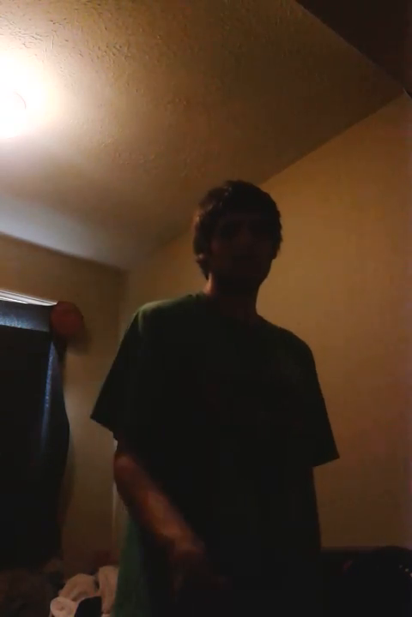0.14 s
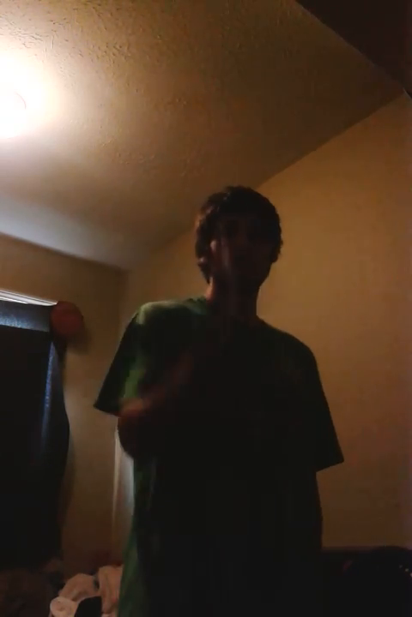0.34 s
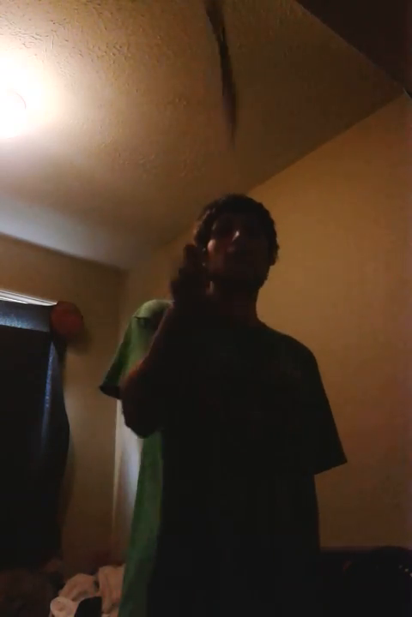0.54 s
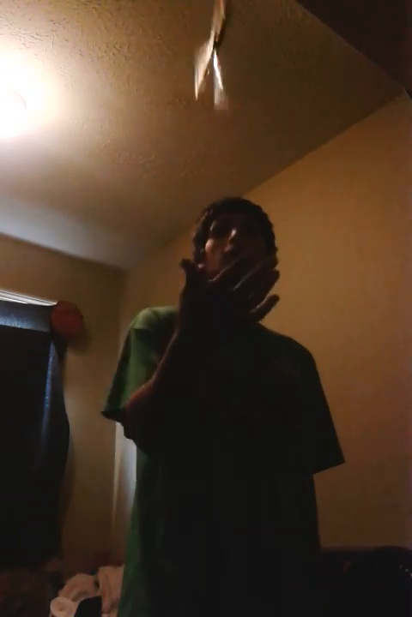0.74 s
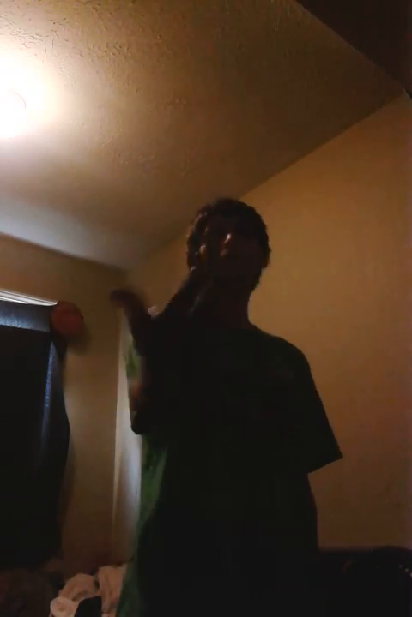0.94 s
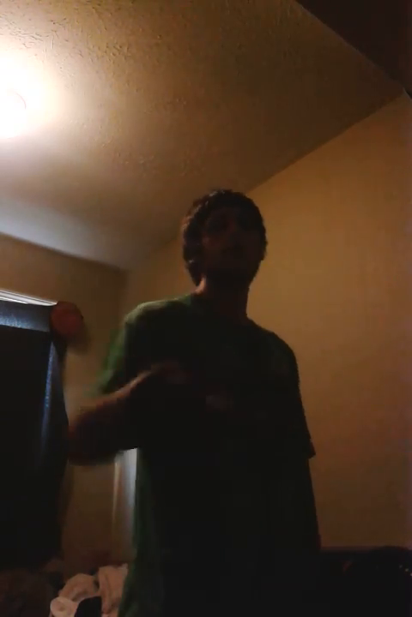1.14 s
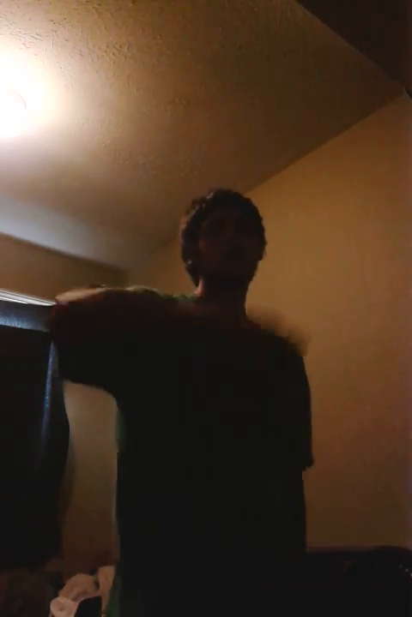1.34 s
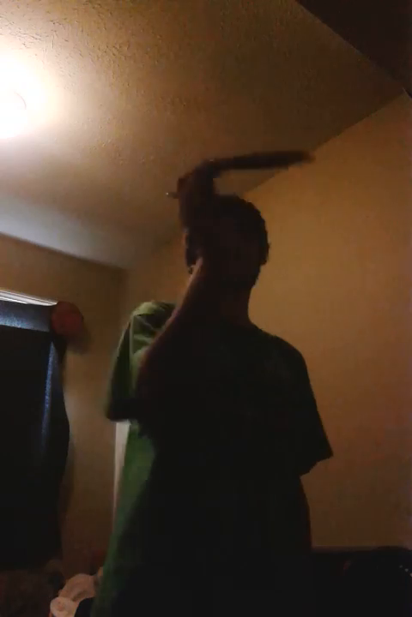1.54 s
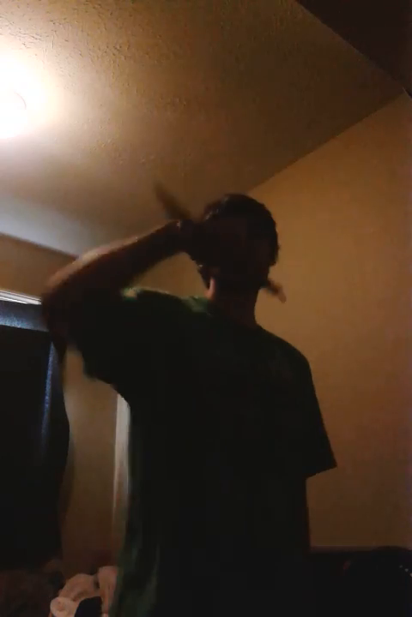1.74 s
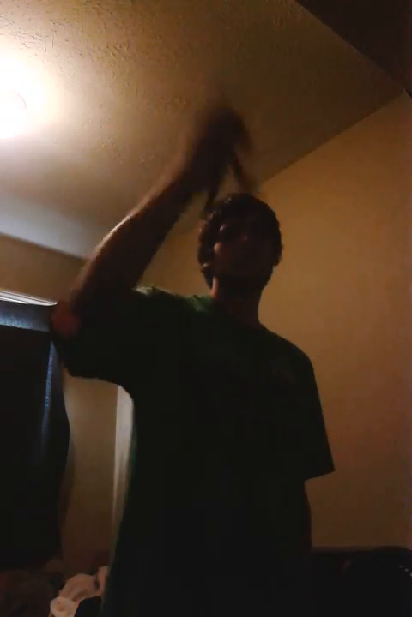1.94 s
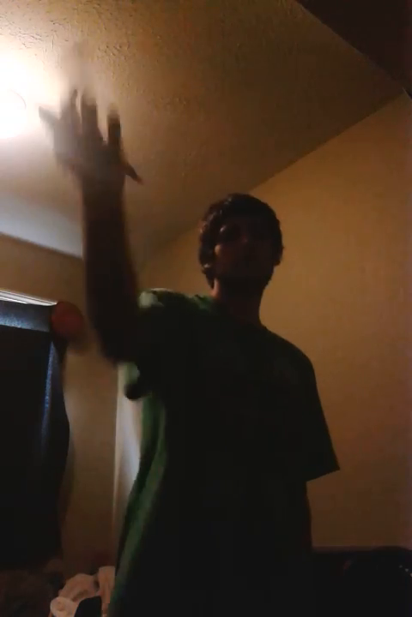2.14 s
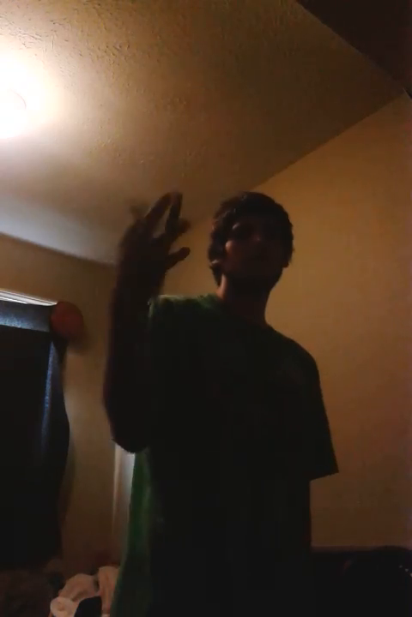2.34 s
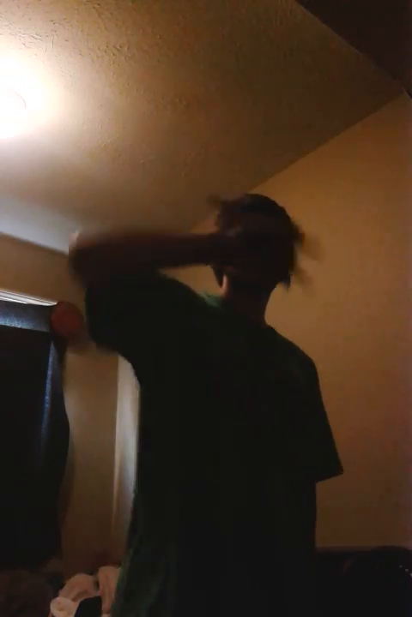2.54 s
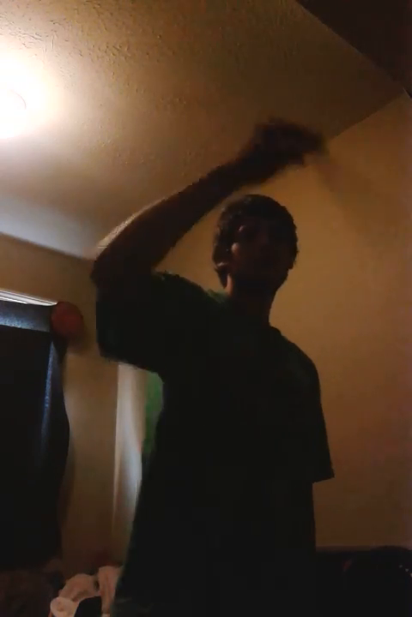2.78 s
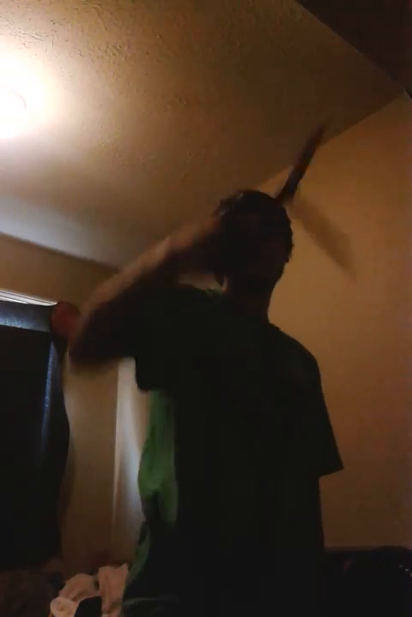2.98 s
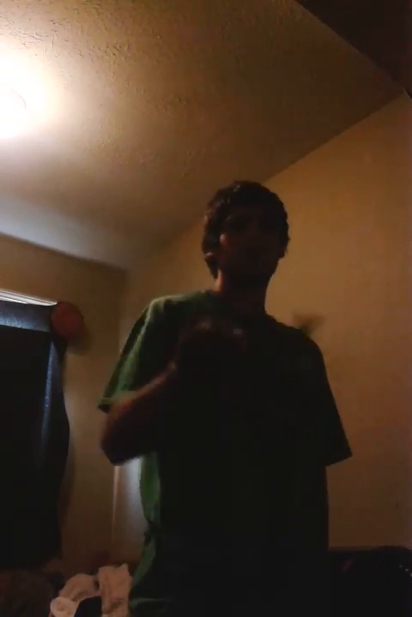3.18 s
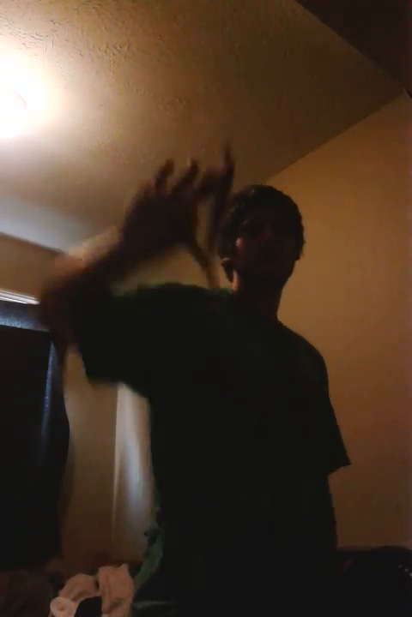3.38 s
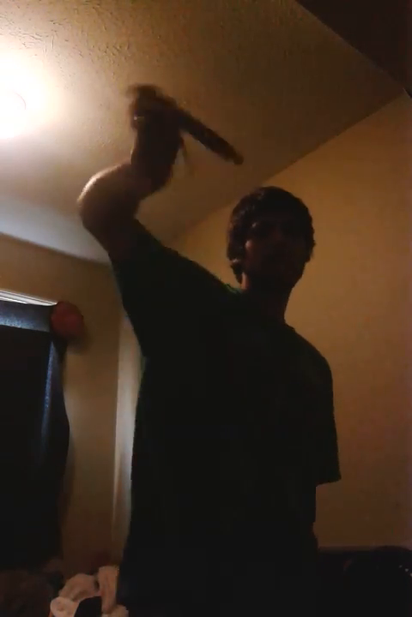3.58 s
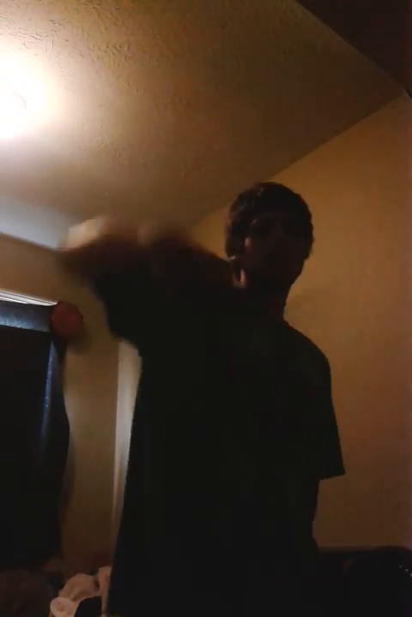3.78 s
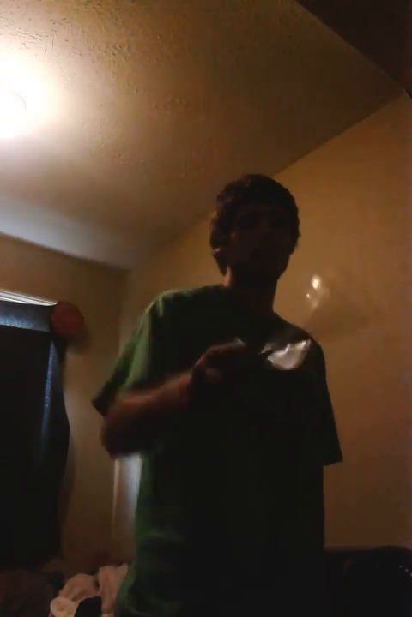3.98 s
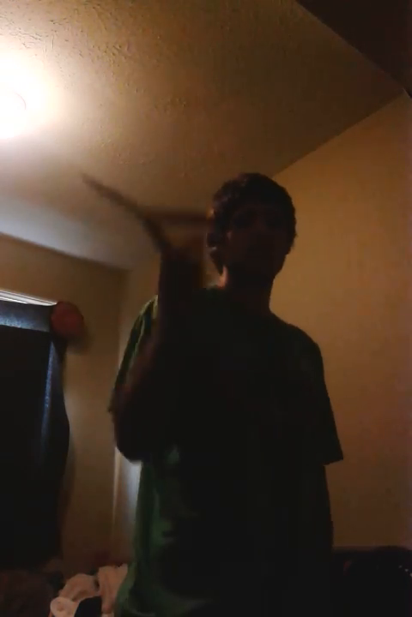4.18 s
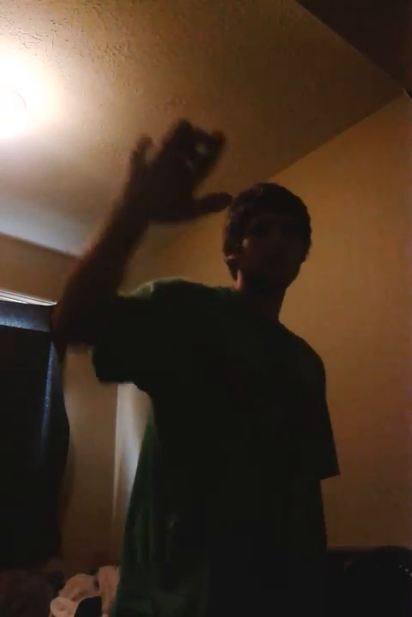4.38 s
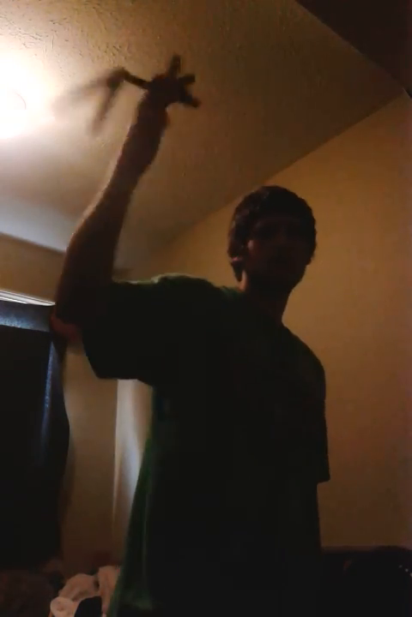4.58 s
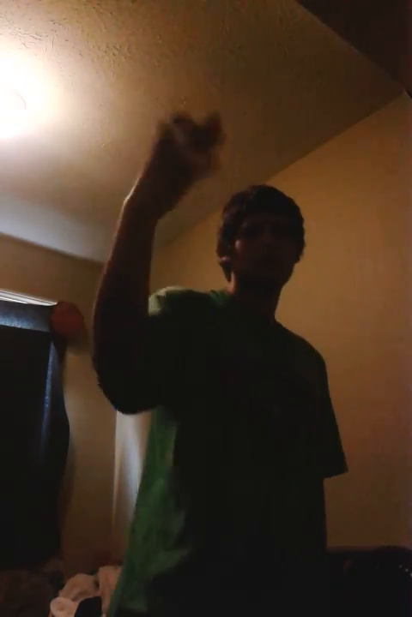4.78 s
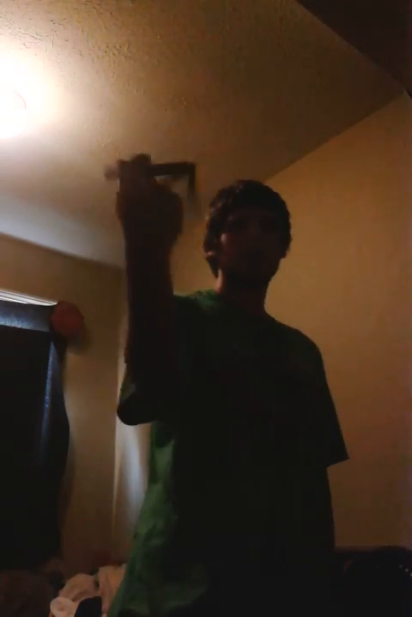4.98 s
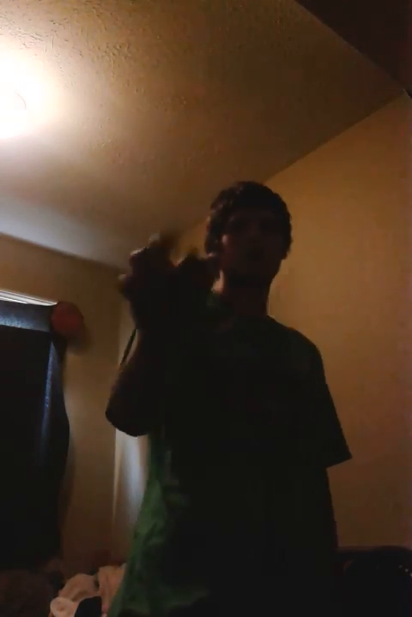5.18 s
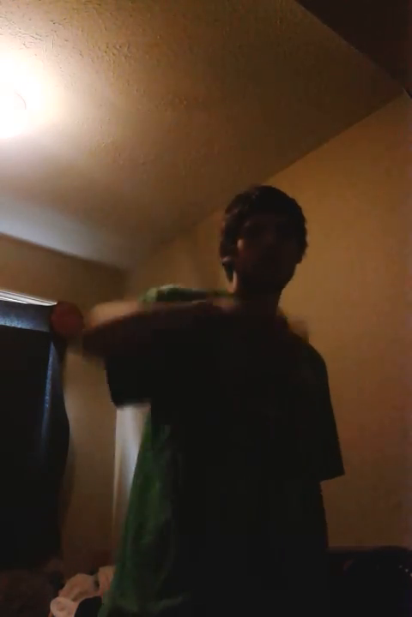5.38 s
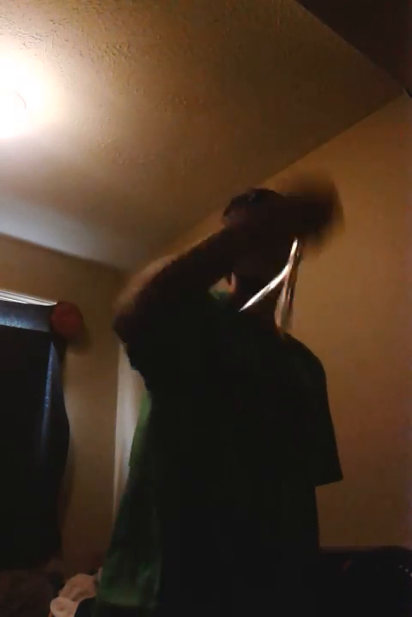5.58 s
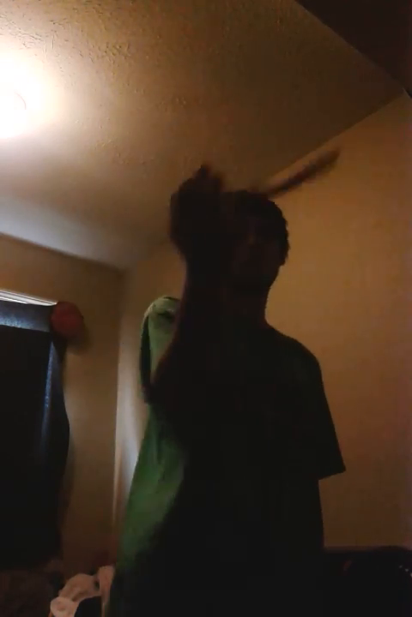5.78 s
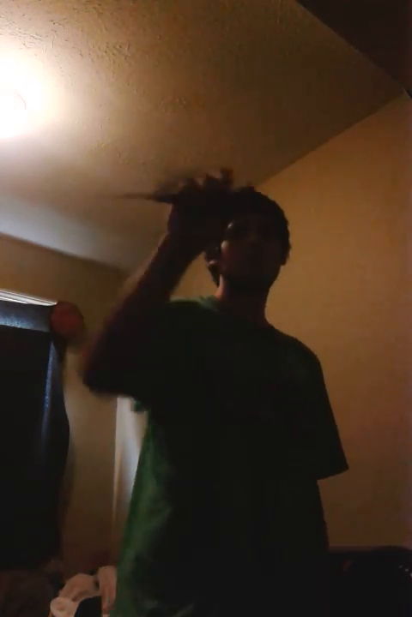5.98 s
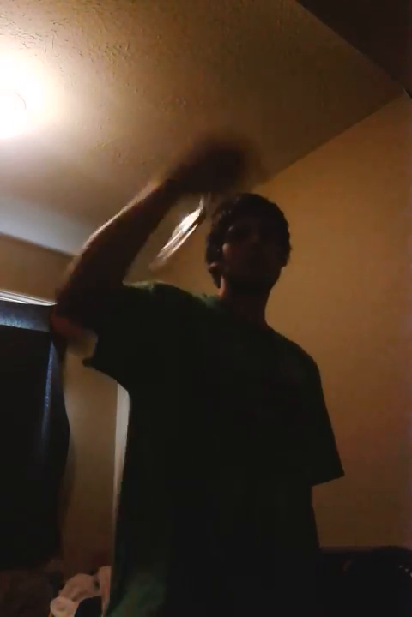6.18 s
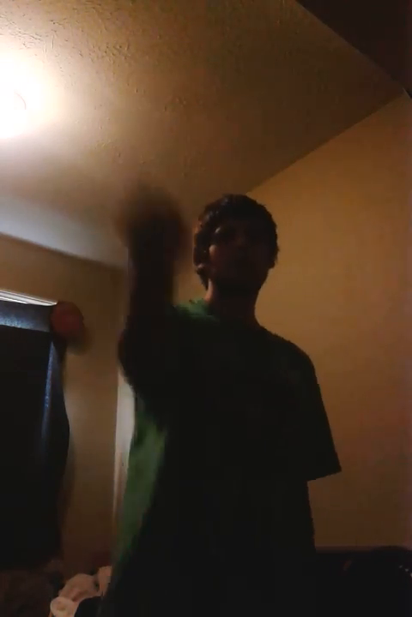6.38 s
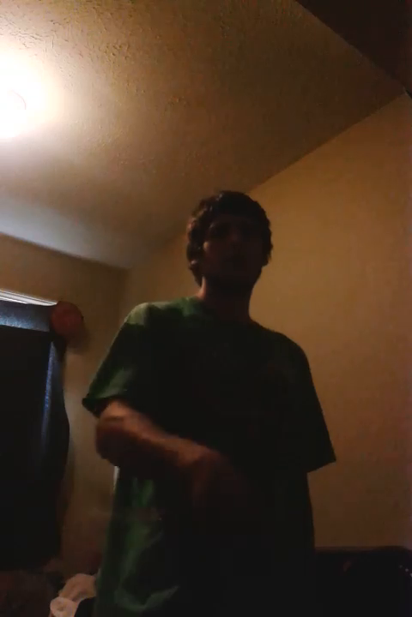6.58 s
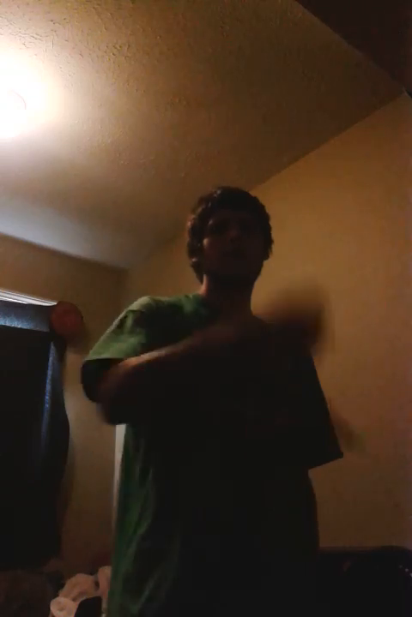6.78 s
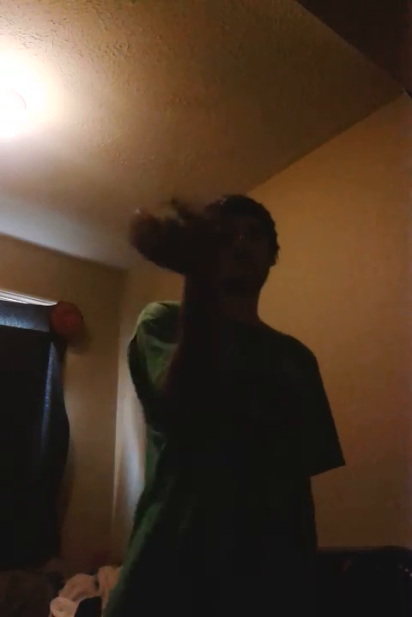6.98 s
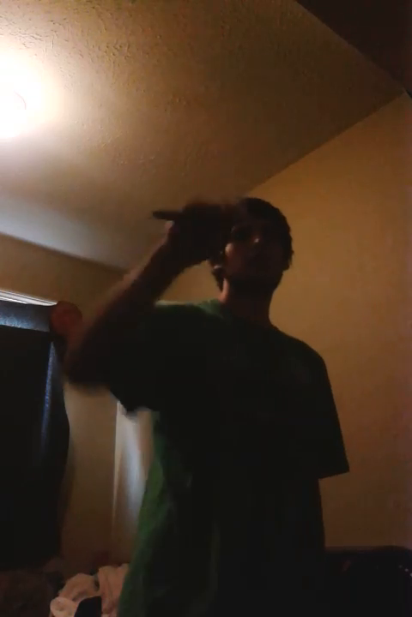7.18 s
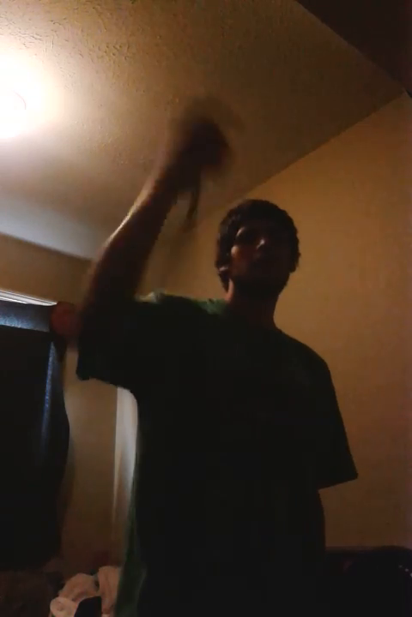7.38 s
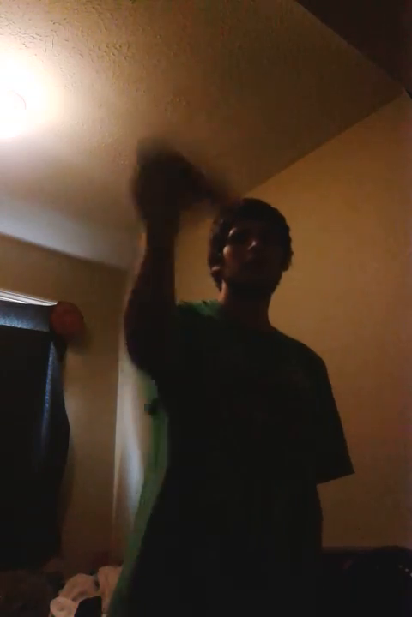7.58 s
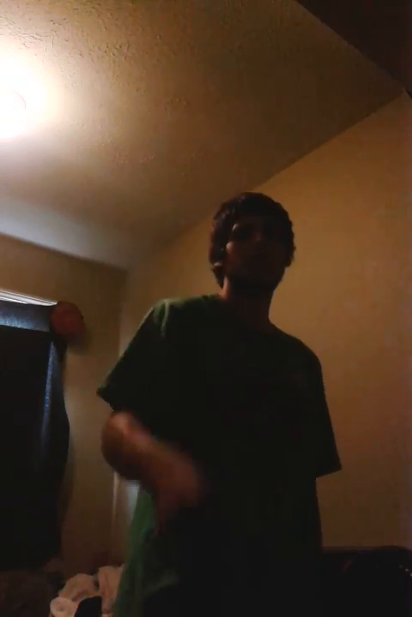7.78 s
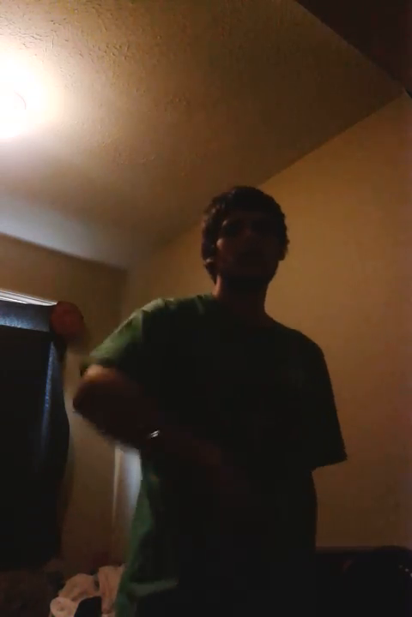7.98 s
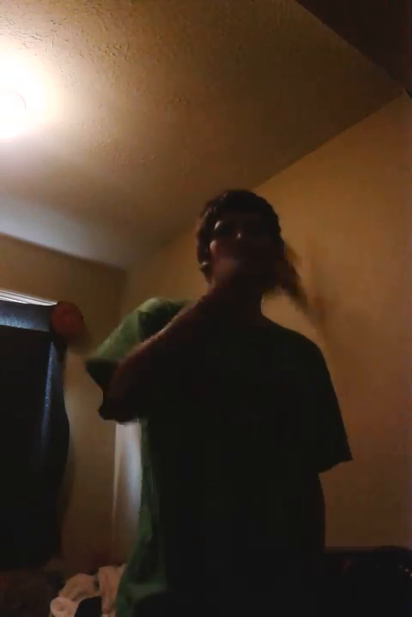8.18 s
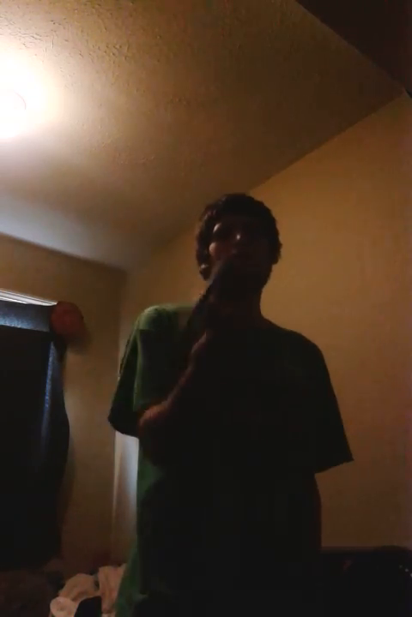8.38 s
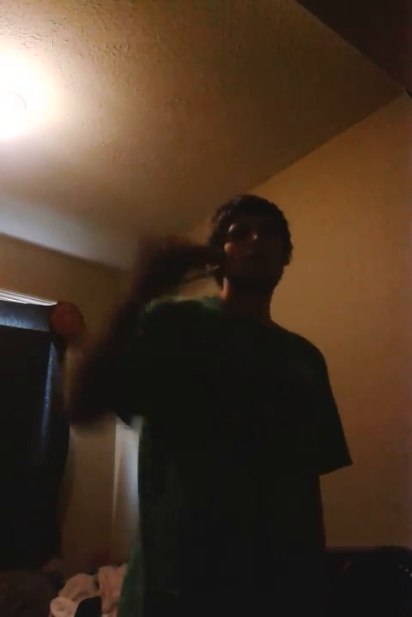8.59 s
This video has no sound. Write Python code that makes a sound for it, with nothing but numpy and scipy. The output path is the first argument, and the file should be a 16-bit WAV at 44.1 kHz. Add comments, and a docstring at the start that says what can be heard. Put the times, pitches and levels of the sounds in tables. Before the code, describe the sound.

A folding knife is flipped by hand, its blade and handles clacking together in quick, uneven bursts. Each bright click trails a little rattle from the loose pivots, and now and then the metal rings briefly. The flipping starts softly, then carries on with sharper clacks and only tiny pauses. The microphone is a step away in a small furnished room with a faint hum.

```python
"""A small furnished room: a folding knife is flipped by hand, a step from a phone microphone.
Handles, blade and latch clack together in short bright contacts; loose pivots chatter after each one.
Now and then the blade or a hollow handle rings on. The walls answer briefly.
Underneath: low rumble, a wavering hum and a faint hiss of air."""
import sys
import numpy as np
from scipy import signal
from scipy.fft import rfft, irfft, next_fast_len
from scipy.io import wavfile
from scipy.ndimage import uniform_filter1d, map_coordinates

SR = 44100
rng = np.random.default_rng(int(sys.argv[2]) if len(sys.argv) > 2 else 0)


def output_pcm(signal):
    """Save a mono or channel-first signal as 16-bit PCM at the path in sys.argv[1].

    Samples are clipped to [-1, 1] before scaling.
    """
    pcm = np.clip(np.atleast_2d(signal).T, -1, 1) * 32767
    wavfile.write(sys.argv[1], SR, np.round(pcm).astype(np.int16))


N = 380562
TOP_HZ = 15935  # microphone band limit


def amp(db):
    return 10 ** (np.asarray(db) / 20)


def unit_rms(x):
    return x / np.sqrt(np.mean(x ** 2) + 1e-20)


def over_time(rows):
    """(s, value) rows interpolated per sample."""
    return np.interp(np.arange(N) / SR, *np.transpose(rows))


def over_hz(rows, hz):
    """(Hz, value) rows interpolated on a log axis."""
    row_hz, values = np.transpose(rows)
    return np.interp(np.log(hz + 1), np.log(row_hz + 1), values)


def wobble(rate_hz):
    """Smooth random curve."""
    knots = rng.standard_normal(int(N * rate_hz / SR) + 4)
    return map_coordinates(knots, [np.arange(N) * rate_hz / SR])


def filtered(x, response):
    size = next_fast_len(N + SR // 2)
    return irfft(rfft(x, size) * response(np.fft.rfftfreq(size, 1 / SR)), size)[..., :N]


def noise(response):
    return unit_rms(filtered(rng.standard_normal(N), response))


def resonance(hz, centre_hz, width_hz):
    """One causal mode, peak gain 1."""
    return 1j * hz * width_hz / (centre_hz ** 2 - hz ** 2 + 1j * hz * width_hz)


# Each row: frequency in Hz, relative density in dB.
RUMBLE_SPECTRUM = [(20, -26.5), (35, -3.5), (65, 4), (130, 5), (200, 3), (400, -34)]
# Each row: time in seconds, level in dB.
RUMBLE_LEVELS = [(0, -64), (1, -67.5), (2.6, -67), (3.1, -65), (3.8, -66), (4.2, -63), (4.8, -67),
                 (5.6, -67), (5.9, -64.5), (6.3, -68.5), (6.7, -63.5), (7.3, -67), (7.8, -65),
                 (8.63, -69.5)]


def rumble(lumps):
    """Low room noise, swelling unevenly."""
    level_db = over_time(RUMBLE_LEVELS) + 2.0 * lumps + 1.66 * wobble(4)
    return amp(level_db) * noise(lambda hz: amp(over_hz(RUMBLE_SPECTRUM, hz)))


# Lower and upper hum band. Each row: time in seconds, level in dB.
LOWER_HUM_LEVELS = [(0, -69), (.9, -69.5), (2.1, -71), (2.4, -65), (4.3, -61), (4.45, -66), (8.63, -80.5)]
UPPER_HUM_LEVELS = [(0, -74), (.7, -72.5), (2.2, -107), (2.4, -61), (2.8, -69.5), (4.4, -69), (4.8, -75),
                    (6.05, -90), (6.2, -57), (6.6, -75), (8, -81), (8.25, -59), (8.63, -96)]


def hum():
    """Two narrow noise bands, each wavering in level."""
    lower = noise(lambda hz: resonance(hz, 259.7, 56) ** 2)
    upper_db = over_time(UPPER_HUM_LEVELS) + 1.4 * wobble(7)
    upper = noise(lambda hz: resonance(hz, 466, 80) ** 2)
    lower_db = over_time(LOWER_HUM_LEVELS) + 1.7 * wobble(9)
    return amp(lower_db) * lower + amp(upper_db) * upper


# Each row: frequency in Hz, relative density in dB.
AIR_SPECTRUM = [(120, -28), (220, -0.5), (460, -2), (800, -5.5), (1800, -10.5), (4000, -12), (14000, -15)]
# Each row: time in seconds, level in dB.
AIR_LEVELS = [(0.0, -59), (0.46, -56.5), (0.79, -65.5), (1.54, -53), (2.06, -58), (2.35, -54.5),
              (3.2, -57.5), (3.75, -54), (4.85, -61), (5.29, -53.5), (6.01, -60), (6.18, -52),
              (6.73, -57.5), (7.67, -57), (7.91, -59), (8.63, -53)]


def air_hiss(lumps):
    """Faint broad hiss of air."""
    level_db = over_time(AIR_LEVELS) + 1.1 * lumps
    return amp(level_db) * noise(lambda hz: amp(over_hz(AIR_SPECTRUM, hz)))


def room_tone(steel, dip_from_db=-33, dip_db_per_db=3, hold_s=.03, dip_below_hz=1200):
    """Rumble, hum and hiss; the lows dip while the steel is loud."""
    lumps = wobble(11)
    tone = rumble(lumps) + hum() + air_hiss(lumps)
    power = uniform_filter1d(steel ** 2, size=round(hold_s * SR), origin=round(hold_s * SR / 3))
    steel_db = 10 * np.log10(np.abs(power) + 1e-12)
    low_gain = amp(-dip_db_per_db * np.clip(steel_db - dip_from_db, 0, None))
    lows = filtered(tone, lambda hz: 1 / (1 + (hz / dip_below_hz) ** 4))
    return tone - (1 - low_gain) * lows


def impact(t, count, t60_s=.005, rise_s=.00072):
    """Force of each blow: one short noise burst."""
    varied_t60_s = t60_s * np.exp(.3 * rng.standard_normal((count, 1)))
    envelope = amp(-60 * t / varied_t60_s) * (1 - np.exp(-(t / rise_s) ** 2))
    return envelope * rng.standard_normal((count, len(t)))


def pivot_chatter(t, level_db, ticks_per_s=1800, scatter_db=4.5, rise_s=.0042, t60_s=.095):
    """Force of the loose pivots: dense ticks that swell and die after each blow."""
    shape = (len(level_db), len(t))
    ticks = (rng.random(shape) < ticks_per_s / SR) * amp(scatter_db * rng.standard_normal(shape))
    grain = amp(-60 * t[:128] / .0024) * rng.standard_normal((len(level_db), 128))
    chatter = signal.fftconvolve(ticks, grain, axes=1)[:, :len(t)]
    chatter *= amp(-60 * t / t60_s) * (1 - np.exp(-(t / rise_s) ** 2))
    strength = np.linalg.norm(chatter, axis=1, keepdims=True)
    return amp(level_db - 7.5) * chatter * np.median(strength) / strength * (t < .15)


def whiten(spectra):
    """Evenly broad in pitch, still ragged in time."""
    return spectra / np.sqrt(uniform_filter1d(np.abs(spectra) ** 2, size=360, axis=1) + 1e-12)


# Each row: frequency in Hz, width before grip damping in Hz, relative gain in dB.
HANDLE_MODES = [(301, 43, -10), (479, 22.5, -2.5), (855, 70, -3), (1130, 280, -7.5), (1534, 406, -5.5),
                (1856, 15, 1), (2404, 43, -5)]


def handle_response(hz, count, grip_damping=1.7):
    """Hollow handles; each new grip weights and shifts their finger-damped modes."""
    grip_db = 4 * rng.standard_normal((count, len(HANDLE_MODES), 1))
    shift = np.exp(.09 * rng.standard_normal(grip_db.shape))
    response = 0
    for k, (mode_hz, width_hz, gain_db) in enumerate(HANDLE_MODES):
        mode = resonance(hz, mode_hz * shift[:, k], grip_damping * width_hz)
        response += (-1) ** k * amp(gain_db + grip_db[:, k]) * mode
    return response


# Each row: time in seconds, relative blade ping in dB, relative edge sizzle in dB.
KNIFE_TURN = [(0.2, -1, 0), (0.43, -1.5, -3.5), (0.58, -5.5, -8), (1.05, -3, 4), (1.36, 0, 4.5),
              (1.54, -10.5, -17), (1.69, 4, 8), (1.83, -7, 1.5), (1.98, -5.5, -12), (2.14, -3.5, 1),
              (2.26, 0.5, 2), (2.56, -8.5, -7), (2.74, -6.5, -12), (2.88, -0.5, 8.5), (3.03, -3, 2.5),
              (3.42, -5.5, -2), (3.53, -3.5, 1), (3.79, -1.5, 6.5), (3.9, -7, 0.5), (4.05, -5, 2),
              (4.38, -7.5, -0.5), (4.69, -3.5, 6), (4.92, -3, 2), (5.13, -7.5, -2), (5.32, -5, 0),
              (5.55, -4.5, 0), (5.74, -5, 4.5), (6.11, -3.5, 1), (6.54, -4.5, 0), (6.76, -2, 2),
              (6.9, -3.5, 4.5), (7.06, -3, -3), (7.21, -1.5, 1.5), (7.39, -3.5, -1.5), (7.65, -1, 1),
              (7.85, -7.5, 0), (8.06, -7.5, 6.5), (8.3, -4, 1), (8.5, -7, -2)]


def ping_and_sizzle(start_s, angle_spread_db=2.2):
    """The turning knife shows more blade or more edge; the angle of each blow adds chance."""
    time_s, *columns_db = np.transpose(KNIFE_TURN)
    return [np.interp(start_s, time_s, db) + angle_spread_db * rng.standard_normal(start_s.shape)
            for db in columns_db]


# Short-lived modes of pins and edge. Each entry: frequency in Hz.
STEEL_MODES_HZ = [6690, 7330, 8800, 10300, 11400, 13950, 14030]


def steel_response(hz, ping_hz, ping_db, sizzle_db, mode_width_hz=750):
    """Blade, pins and thin edge; each blow lands elsewhere and wakes its own mix of modes."""
    clatter = resonance(hz, 4600, 3300) ** 3
    ping = amp(1.3 * ping_db - 1.5) * resonance(hz, ping_hz, 800) ** 2  # freer blade, clearer pitch
    blade = amp(ping_db + 1.76) * (clatter + ping)
    pins = resonance(hz, 8106, 2600) ** 2
    edge = amp(sizzle_db - 8.5) * resonance(hz, 11640, 11200) ** 2
    gains = amp(-1 + 5 * rng.standard_normal((len(ping_hz), len(STEEL_MODES_HZ), 1)))
    shift = np.exp(.035 * rng.standard_normal(gains.shape))
    modes = sum(gains[:, k] * resonance(hz, mode_hz * shift[:, k], mode_width_hz)
                for k, mode_hz in enumerate(STEEL_MODES_HZ))
    response = (pins - blade - edge) * (1 + modes)
    strength = np.linalg.norm(response * (hz < TOP_HZ), axis=1, keepdims=True)
    return response * np.median(strength) / strength  # equal energy per blow


# Each row: start in seconds, level in dB, handle knock in dB, blade pitch in Hz, pivot chatter in dB.
# Levels are relative; knock and chatter scale with the blow.
CONTACTS = [(0.0939,-32,-29,4430,-18),(0.147,-36.5,-10,5500,-5.5),(.189,-24,-13,3700,-3),(0.417,-21.5,-10,3900,-5),(0.432,-27,-16,5100,-16),(0.4415,-21.5,-19,5300,-13),(.571,-37,-8.5,3930,1.5),
            (0.995,-15,-18.5,4340,-5),(1.0151,-9.5,-27,3830,-12),(1.034,-12.5,-40,3830,-2),(1.0367,-10.5,-15,5500,-30),(1.051,-2.5,-47,3970,-16.5),(1.065,-6,-17,4570,-19),(1.213,-52,-1,4700,1.5),(1.281,-39,-1.5,5300,-4.5),(1.31,-32.5,-30,4940,-7),(1.339,-28,-51,4500,1),(1.349,-13.5,-60,4520,0.5),(1.4018,-16.5,-14,4600,-8.5),(1.421,-25,-21,4800,-10),(1.437,-14,-15,4800,-16),(1.4984,-20,-20,4930,-11.5),(1.541,-11,-19,5030,-23),(1.557,-33.5,-9.5,5700,3.5),(1.614,-24.5,-12,5300,-7),(1.654,-21,-12,3800,-13),(1.671,-30.5,-30,3900,-3),(1.69,-8,-13.5,5440,-16.5),(1.7324,-27,-3,4300,-31),(1.7973,-34.5,-25,5050,-12),(1.8275,-21,-18,5330,-8.5),(1.9702,-11.5,-23,4970,-10),
            (2.1225,-26.5,-14,4960,-2),(2.151,-22.5,-26,5030,-9),(2.205,-24.5,-12,4830,-11),(2.233,-25.5,-32,4470,-9),(2.247,-22.5,-8.5,4480,4.5),(2.252,-7.5,-12.5,4700,-13),(2.289,-16,-10,4670,-10),(2.338,-29.5,-23,5200,-2),(2.3563,-15,-16.5,3640,-9),(2.388,-31.5,-7,4760,2),(2.444,-25.5,-9,4560,3.5),(2.52,-21,-20,4700,-19),(2.5259,-19.5,-6.5,4700,-20),(2.553,-11,-12,4900,-26),(2.558,-13,-31,4900,-17.5),(2.5636,-23.5,-8,4900,-29),(2.734,-25,-29,4750,-16),(2.737,-20,-6.5,4800,-10.5),(2.8179,-21.5,-12,4600,-15),(2.8246,-19.5,-11,4700,-5.5),(2.878,-8.5,-18,5530,-17),(2.9323,-18,-13,5570,-16),(2.98,-24,-4.5,4220,-22),
            (3.0199,-10.5,-9.5,5040,-13.5),(3.198,-38,-20,4940,-4),(3.25,-44.5,-23,5100,0),(3.308,-39,-8,4700,-1),(3.348,-22,-10.5,4630,-10.5),(3.363,-16,-32,4800,-20),(3.418,-10,-13,5160,-16.5),(3.5125,-21,-23,5440,-8),(3.5302,-19,-27,5400,-20),(3.5352,-13,-13,5560,-18),(3.591,-27,-25,4020,-25),(3.599,-18,-7.5,4020,-3.5),(3.651,-25,-9,4800,-6),(3.703,-27.5,-10,3820,-5),(3.733,-29,-15,5100,-3),(3.7517,-27,-15,5500,-2.5),(3.786,-10,-14,4560,-12.5),(3.8298,-32,-7,3820,-8),(3.8474,-33,1,3520,-16),(3.879,-25.5,-33,4750,-5),(3.899,-9,-17,4480,-15.5),
            (4.006,-43.5,-11,4660,6),(4.0449,-4.5,-17,4960,-10.5),(4.1085,-18.5,-12.5,5050,-16),(4.118,-21,-15,5000,-24),(4.2206,-35,-34,4600,-31),(4.247,-46,-7,4600,1),(4.2623,-20.5,-21,4600,-10),(4.2713,-16.5,-14,4060,-2.5),(4.362,-23.5,-10,5170,1),(4.3694,-6.5,-19.5,5170,-7.5),(4.405,-16,-36,3830,1),(4.4104,-8,-14,3830,-28),(4.432,-20.5,-16,4900,-0.5),(4.514,-33.5,-14,4840,5),(4.523,-29.5,-4,4800,-8.5),(4.824,-36.5,-4.5,4800,0.5),(4.845,-34,-16,4860,5),(4.8683,-22.5,-12.5,4840,-1),(4.884,-33,-18,4800,-6),(4.9132,-11.5,-38,5140,-8),(4.9565,-10,-14.5,4900,-18),(4.9713,-32,-25,5700,-17),
            (5.0626,-22,-13.5,5200,-6.5),(5.091,-22,-14,5700,-14),(5.117,-14.5,-30,3770,-13.5),(5.1222,-24,-28,4700,-19),(5.132,-22,-8.5,4740,-16),(5.151,-32,-30,4700,3),(5.165,-20,-8.5,3720,-10),(5.234,-9,-12,4660,-40),(5.237,0,-44,5100,-43),(5.2973,-8,-16,4600,-41),(5.3206,-7,-33,4630,-18),(5.3228,-1,-18,4700,-60),(5.379,-16.5,-13,4700,-28),(5.425,-13.5,-19,3870,-25),(5.4848,-50,-24,4800,-30),(5.4902,-9.5,-22.5,4770,-18.5),(5.5105,-48,-32,4840,-37),(5.5386,-4.5,-17,4530,-10.5),(5.5535,-9,-12.5,4570,-39),(5.61,-22,-37,4600,-14),(5.6184,-24,-39,4700,-14),(5.636,-9.5,-15,4930,-22),(5.7314,-12,-17.5,4930,-6.5),(5.9223,-37,-18,3700,-7),(5.974,-16.5,-19,3800,-11),(5.9804,-22,-9.5,3730,-9),
            (6.006,-23.5,-34,4640,-10),(6.0166,-26,-37,5700,-6),(6.035,-12.5,-11,5500,-17),(6.0651,-14.5,-17,3920,-11.5),(6.096,-7,-18,5500,-13),(6.113,-2,-34,3960,-37),(6.137,-25,-7,5000,-3.5),(6.151,-15,-18,4830,-2),(6.1617,-14,-16.5,4770,-6.5),(6.215,-29,-15,4800,5.5),(6.224,-26,-10,4800,-10),(6.2614,-15,-16,5700,-12.5),(6.3147,-23.5,-16,5550,-18),(6.426,-36,-30,5700,-5),(6.436,-25.5,-28,5740,-2),(6.443,-25.5,-8,5600,-0.5),(6.5177,-10,-12,4700,-9),(6.528,-1.5,-46,5600,-9),(6.541,-12,-19,4360,-2.5),(6.568,-14.5,-32,5000,-9),(6.6436,-33,-9,4500,-11.5),(6.745,-30.5,-14,4900,-2.5),(6.8438,-27.5,-25,5300,-11),(6.857,-19,-19,5100,-13),(6.892,-19.5,-36,4760,-5),(6.8991,-15.5,-6,4600,-11.5),(6.9214,-21,-31,4630,-7.5),
            (7.0199,-25.5,2,3800,-4),(7.035,-27,-20,5500,4),(7.0401,-15,-30,5570,-11),(7.0519,0.5,-17.5,3900,-17.5),(7.0541,-9.5,-14,3960,-23),(7.0627,-19,-31,4500,-13),(7.078,-23,-22,5360,-15),(7.0904,-4,-21.5,3700,-17),(7.1,-11,-35,4500,-30),(7.202,-21,-14.5,3880,-8),(7.2483,-31,-2,4970,-10.5),(7.313,-30.5,-16,3860,-7),(7.326,-34.5,-23,3720,-3),(7.337,-38,-7,3800,-9),(7.375,-22.5,-15,5040,-7),(7.392,-14,-13.5,5130,-21),(7.478,-24,-16,3740,-9.5),(7.509,-25,-13,4220,-1),(7.5478,-15.5,-17,5300,-16),(7.615,-1,-17.5,4620,-18.5),(7.64,-9,-36,5030,-17),(7.649,-7,-18,5000,-4),(7.6504,0.5,-10.5,5300,-31),(7.6638,-5,-15,4760,-37),(7.6947,-12,-43,4830,-11.5),(7.704,-6.5,-40,5000,-13),(7.818,-35,-21,4500,-2),(7.8226,-35,3,4600,-16),(7.8419,-29.5,-8.5,3800,0),(7.9265,-41,-11,4630,-4),
            (8.018,-47,-35,5700,-26),(8.0478,-34,-16,5700,-23),(8.0623,-16.5,-19,5000,-41),(8.111,-34,1.5,4800,-4),(8.1847,-20,-7,3940,-9),(8.288,-16,-33,5000,-10),(8.392,-36,-17,5700,-12),(8.4068,-27.5,-26,5700,-24),(8.445,-30,-25,4350,-7),(8.4795,-20.5,-6.5,4800,-8),(8.494,-21.5,-14,4830,-8.5),(8.502,-17.5,-11,4960,-32),(8.5525,-49,13,5100,0),(8.567,-19.5,-11,4970,-11.5)]


def knife_clacks(graze_s=.003, size=2 ** 13):
    """The parts graze, then meet squarely; blow and chatter drive steel and handles."""
    t, hz = np.arange(size) / SR, np.fft.rfftfreq(size, 1 / SR)
    start_s, level_db, knock_db, ping_hz, chatter_db = np.array(CONTACTS).T[:, :, None]
    ping_db, sizzle_db = ping_and_sizzle(start_s)
    handles = amp(knock_db + 9.5) * handle_response(hz, len(CONTACTS))
    burst = whiten(rfft(impact(t, len(CONTACTS))))
    chatter = rfft(pivot_chatter(t, chatter_db))
    chatter = whiten(chatter) * np.sqrt(np.mean(np.abs(chatter) ** 2, axis=1, keepdims=True))
    push = np.exp(-2j * np.pi * hz * graze_s)  # impulse at the end of the graze
    clack = (burst * push + chatter) * steel_response(hz, ping_hz, ping_db, sizzle_db)
    knock = (push + chatter) * handles  # slow modes feel the burst as one push
    sounds = amp(level_db + 10) * irfft(clack + knock, size)
    out = np.zeros(N + size)
    for at_s, sound in zip(start_s[:, 0], sounds):
        out[round((at_s - graze_s) * SR):][:size] += sound
    return out[:N]


# Each row: frequency in Hz, time to fall 60 dB in seconds.
WALL_DECAY = [(500, 0.27), (1500, 0.23), (3500, 0.22), (9000, 0.15), (14000, 0.16)]


def wall_reflections(direct, delay_s=.0037, rise_s=.00011):
    """Short room tail, treble dying sooner; the knife moves, so every 0.1 s meets a new tail."""
    step, size = SR // 10, SR * 2 // 5
    pieces = np.pad(direct, (0, -N % step)).reshape(-1, step)
    hz, t, spectra = signal.stft(rng.standard_normal((len(pieces), size)), SR, nperseg=128)
    decay = amp(-60 * t / over_hz(WALL_DECAY, hz)[:, None])
    tails = signal.istft(spectra * decay, SR, nperseg=128)[1][:, :size]
    tails *= 1 - np.exp(-np.arange(size) / SR / rise_s)
    tails /= np.linalg.norm(tails, axis=1, keepdims=True)
    out = np.zeros(N + SR)
    for k, echo in enumerate(signal.fftconvolve(pieces, tails, axes=1)):
        out[k * step + round(delay_s * SR):][:len(echo)] += echo
    return out[:N]


# Each row: start in seconds, level in dB, pitch in Hz, width in Hz, time to fall 60 dB in seconds.
KNIFE_RINGS = [(0.421, -55, 1820, 200, 0.38), (.722, -58, 5000, 270, 0.053), (1.036, -55, 890, 250, 0.023),
               (1.052, -32.5, 2300, 710, 0.091), (1.353, -16, 4540, 270, 0.049),
               (1.796, -21.5, 5150, 271, 0.029), (5.323, -43, 770, 198, 0.16),
               (6.218, -38, 2000, 250, 0.08), (6.521, -46, 834, 150, 0.13), (6.535, -47, 1960, 250, 0.22),
               (7.051, -36.5, 2060, 700, 0.14), (7.65, -37.5, 900, 149, 0.079), (7.66, -54, 426, 151, 0.15),
               (7.653, -27, 1820, 800, 0.052)]


def knife_rings(rise_s=.0022):
    """Blade or hollow handle rings on after some touches: narrow, decaying noise."""
    out, t = np.zeros(N + SR), np.arange(SR // 2) / SR
    hz = np.fft.rfftfreq(len(t), 1 / SR)
    for start_s, level_db, pitch_hz, width_hz, t60_s in KNIFE_RINGS:
        band = rfft(rng.standard_normal(len(t))) * resonance(hz, pitch_hz, width_hz) ** 2
        envelope = amp(level_db - 60 * t / t60_s) * (1 - np.exp(-t / rise_s))
        out[round(start_s * SR):][:len(t)] += envelope * unit_rms(irfft(band, len(t)))
    return out[:N]


def scene(low_cut_hz=150, walls_db=-5.5):
    """Knife, walls and room tone; one microphone feeds both channels."""
    knife = knife_clacks() + knife_rings()
    direct = filtered(knife, lambda hz: (1j * hz / (low_cut_hz + 1j * hz)) ** 3)  # too small for bass
    steel = direct + amp(walls_db) * wall_reflections(direct)
    mono = steel + room_tone(steel)
    return np.array([mono, mono])


# Capsule response and treble roll-off. Each row: frequency in Hz, gain in dB.
MIC_RESPONSE = [(100, 3.5), (6000, -1.5), (8200, 0), (10000, 1), (14000, 1)]
MIC_ROLLOFF = [(14550, 0), (14900, -22), (16000, -42)]


def record(dry, ceiling=.9):
    """The phone microphone colours the sound, rounds the hardest peaks and limits the band."""
    coloured = filtered(dry, lambda hz: amp(over_hz(MIC_RESPONSE, hz) + over_hz(MIC_ROLLOFF, hz)))
    rounded = coloured / (1 + np.abs(coloured / ceiling) ** 6) ** (1 / 6)
    return filtered(rounded, lambda hz: hz < TOP_HZ)


dry = scene()
out = record(dry)
output_pcm(out)
```